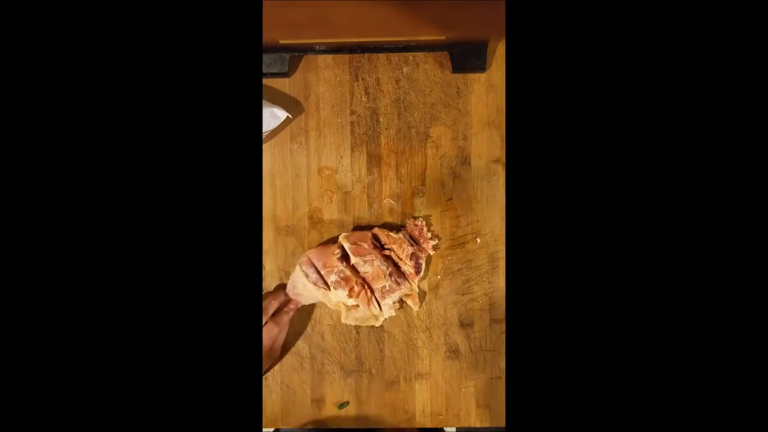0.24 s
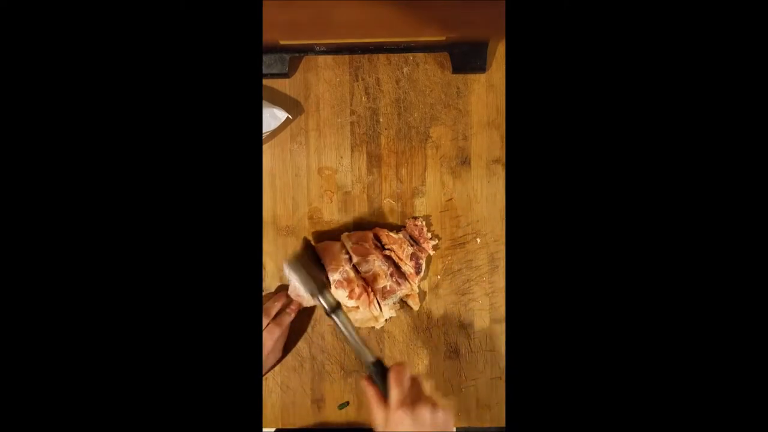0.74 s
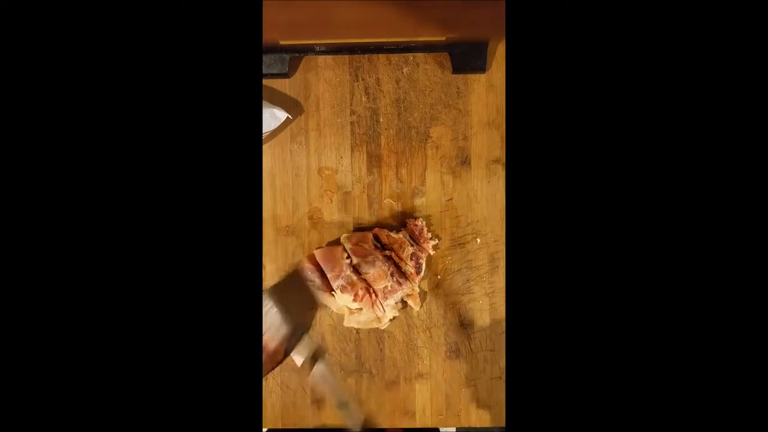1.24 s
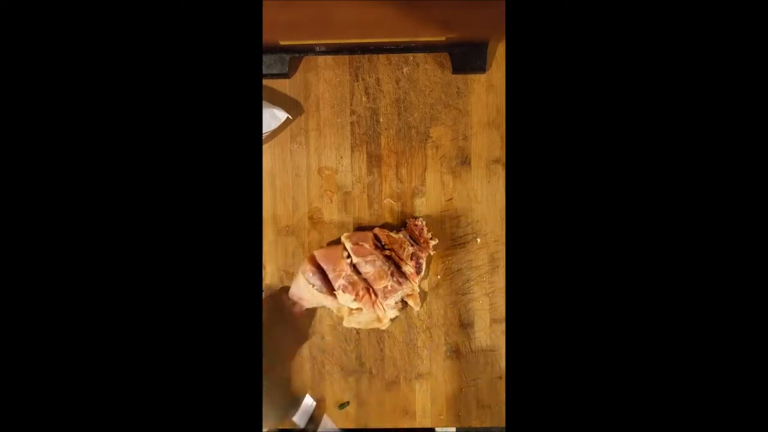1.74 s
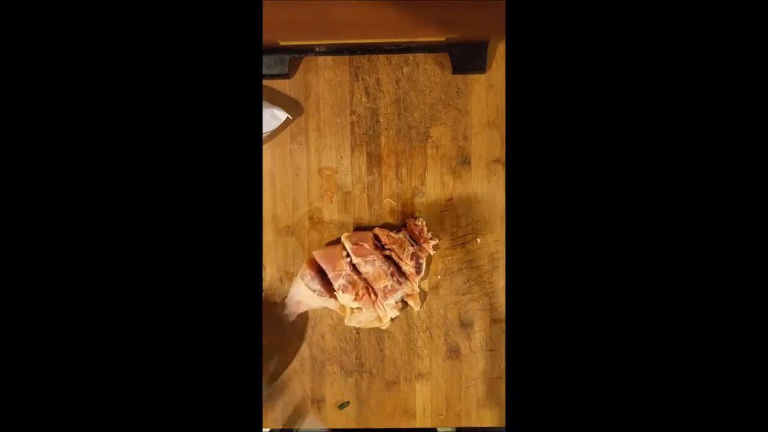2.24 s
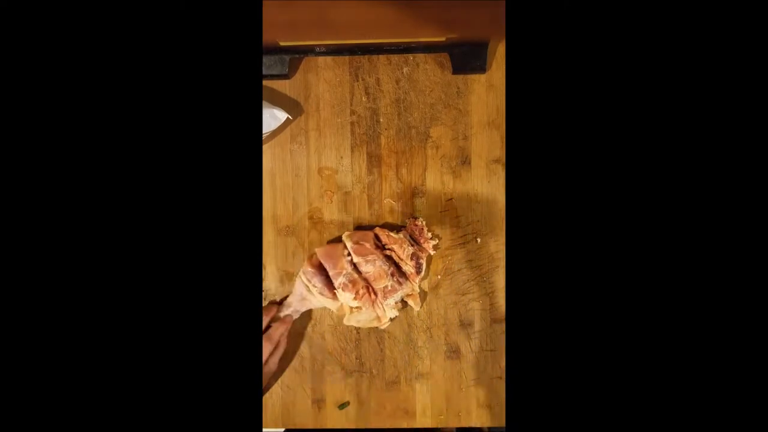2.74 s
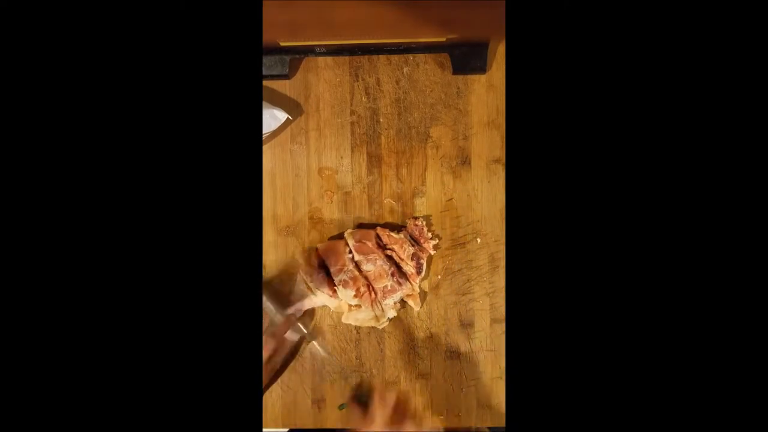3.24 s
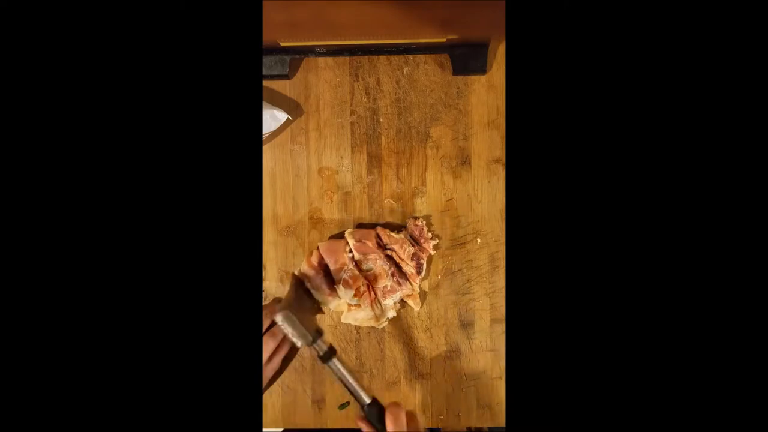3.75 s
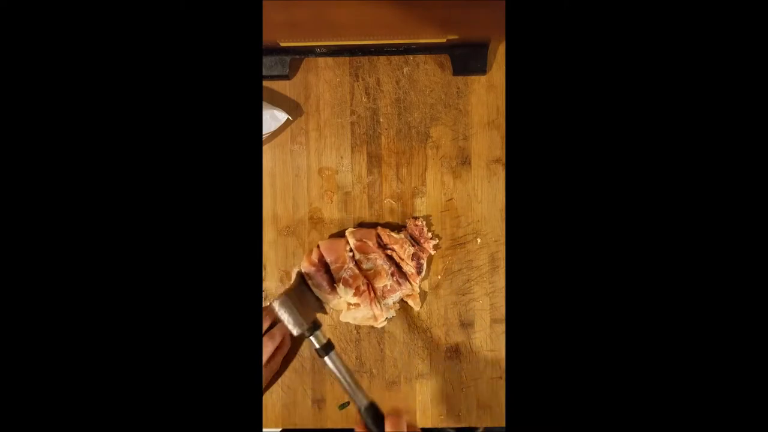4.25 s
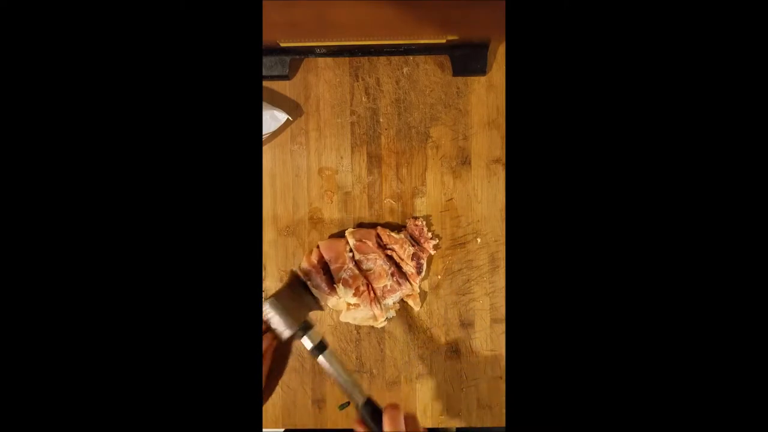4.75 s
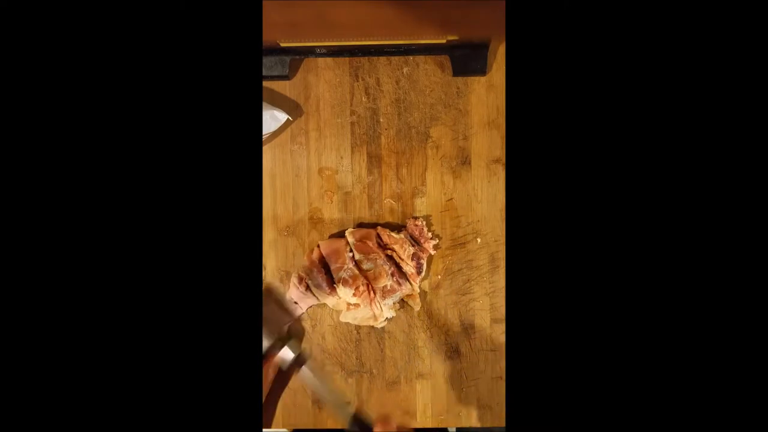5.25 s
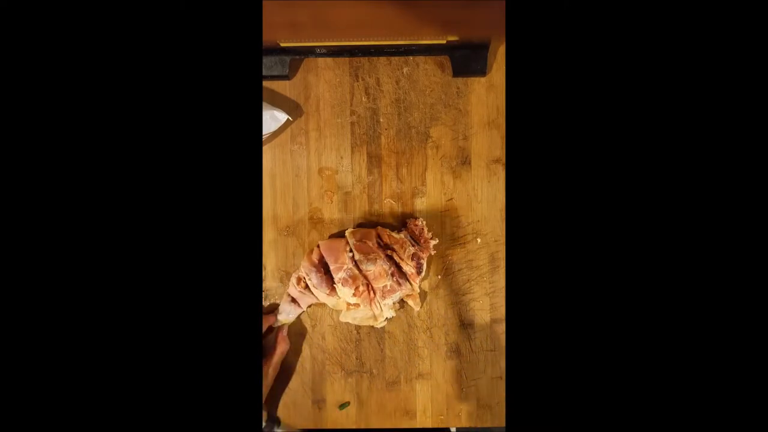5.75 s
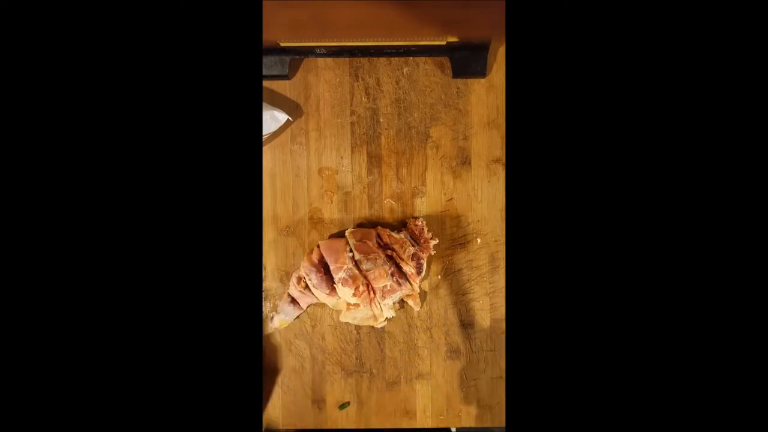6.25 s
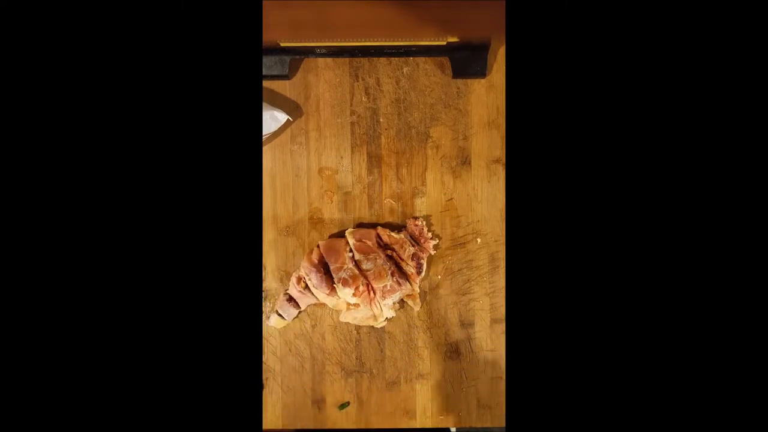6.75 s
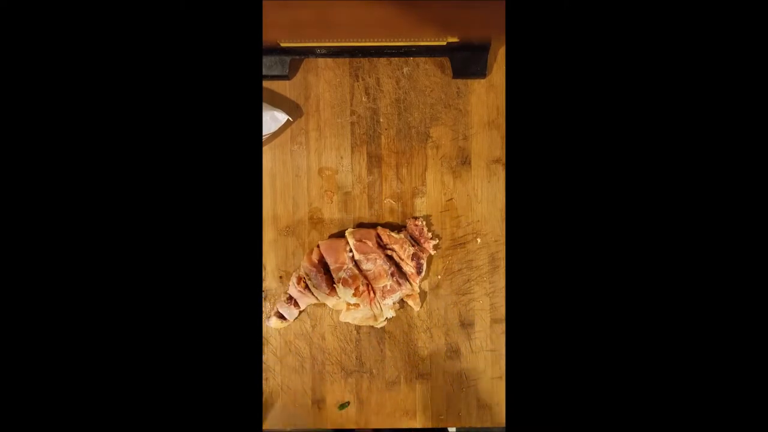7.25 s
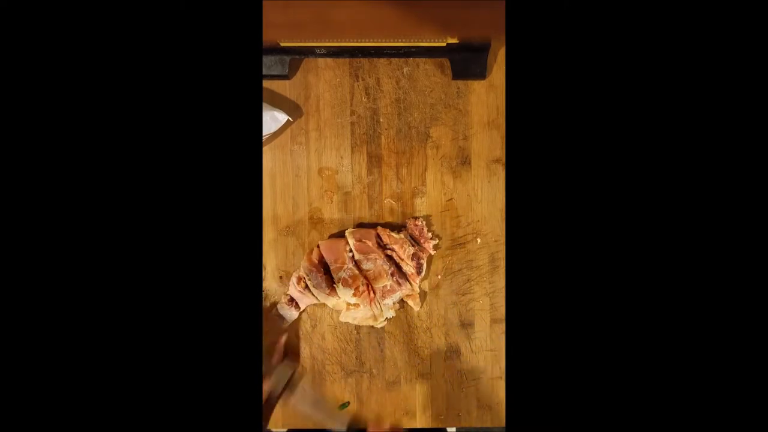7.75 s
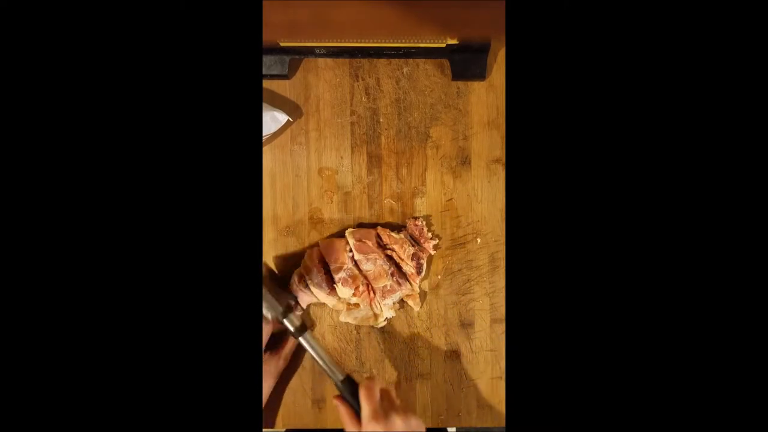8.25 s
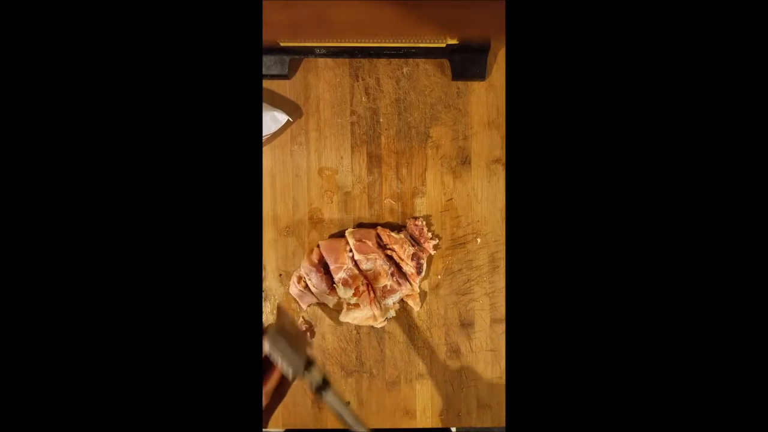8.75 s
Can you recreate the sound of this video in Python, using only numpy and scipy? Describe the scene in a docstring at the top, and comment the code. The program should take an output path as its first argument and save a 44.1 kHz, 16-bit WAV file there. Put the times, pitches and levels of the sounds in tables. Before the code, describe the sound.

A hatchet chops a raw chicken leg on a wooden block, cracking bone with hollow knocks, table thumps and rattles in a small kitchen.

```python
"""Sharp cracks and hollow wooden knocks: a hatchet chops a raw chicken leg on a butcher block in a small kitchen.
Each blow tears skin and bone (filtered random clicks), and knocks the block (decaying sines and wood noise).
The table thumps (struck resonators) and loose things on it rattle (a cluster of clicks, some ringing steel).
Between blows wet meat is shifted and ticks; at the end the blade scrapes and judders at the joint.
Decaying band noise gives the kitchen echo; filtered noise gives the quiet of the room."""
import sys
import numpy as np
from scipy import signal
from scipy.fft import rfft, irfft
from scipy.io import wavfile

SR = 44100
rng = np.random.default_rng(int(sys.argv[2]) if len(sys.argv) > 2 else 0)


def unload_audio(sound):
    """Save the sound as a 16-bit wav file, at the path given as the first command line argument."""
    columns = np.transpose(np.atleast_2d(sound))
    # keep every value between -1 and 1, then stretch to whole-number steps
    steps = np.round(np.clip(columns, -1, 1) * 32767)
    wavfile.write(sys.argv[1], SR, steps.astype(np.int16))


N = 397339

# blows: t/s, strength/dB, time through the meat/s, clack centre f/Hz, bone crack re strength/dB
BLOWS = [(-.094, -24.5, 0.0056, 730, -7.5), (.339, -24, .004, 970, -0.5), (0.7223, -24, 0.00058, 980, -8.5),
         (1.108, -51, .009, 1400, 1.5), (1.49, -24.5, 0.0016, 820, -24), (1.859, -28, .001, 971.1, -24),
         (2.519, -25.5, .0115, 1040, -19), (2.901, -20, .007, 1094, -6), (3.282, -20, 0.0033, 844, -19),
         (3.738, -29.5, 0.0047, 1070, -3.5), (4.105, -22.5, 0.0091, 940, -5),
         (4.521, -20, .0027, 1020, -18), (5.083, -33.5, .008, 1118, -6), (5.493, -18, 0.011, 1080, -21),
         (5.862, -24.5, 0.00074, 1114, -5.5), (6.411, -38, .0045, 1150, -2),
         (6.85, -19.5, 0.0083, 830.3, -13), (7.32, -20.5, 0.0035, 1404, -20.5),
         (7.823, -26, 0.0027, 1130, -28)]
# tearing skin and bone: f/Hz, relative level/dB per Hz
CRACK_SPECTRUM = [(300, 6), (900, 0.5), (2000, 7.5), (3500, 0), (5000, -6.5), (6600, -6), (9000, -17.5),
                  (13000, -12), (16000, -19)]
# lowest bending modes of the block: nominal f/Hz, nominal level/dB, t60/s
BLOCK_BENDING_MODES = [(517.1, -2.5, .1), (556.1, 0, 0.15), (612.3, 5, 0.052), (681, -7.5, 0.07)]
# stiffer modes of the block: nominal f/Hz, nominal level/dB, t60/s
BLOCK_CLACK_MODES = [(833.5, 0.5, .07), (1007, -6, 0.026), (1159, -3.5, .045), (1240, -4, 0.0043),
                     (1594, -4, 0.024), (1660, -7.5, 0.08), (1828, 0, 0.054)]
# dense wood resonances between the modes: f/Hz, relative level/dB per Hz
WOOD_SPECTRUM = [(100, -26), (200, -12.5), (400, -4), (600, -2), (1000, -3), (1800, -5), (2300, -6),
                 (3200, -15.5), (5000, -32), (8000, -44.5), (16000, -49.5)]
# table under the block: nominal f/Hz, nominal level/dB, t60/s, left minus right/dB
TABLE_TOP_MODES = [(57.7, -13, 0.28, -0.5), (72.4, -9, 0.37, 2.5), (97.8, -1.5, .21, 0),
                   (128.5, -7.5, 0.22, -5), (160.3, -1.5, 0.15, -2.5), (201.7, -8, 0.16, -7),
                   (263.8, -14.5, 0.22, -4), (369, -11, 0.24, 6.5)]
# loose things falling back: f/Hz, relative level/dB per Hz
RATTLE_SPECTRUM = [(200, -7.5), (400, -3), (600, 5.5), (1100, -4), (1700, -4), (2500, -6), (3500, -15),
                   (5000, -24.5), (6500, -30.5), (9000, -36.5), (16000, -34.5)]
# loose steel things on the table: f/Hz, relative level/dB, t60/s
LOOSE_STEEL_MODES = [(1703, -8, 0.22), (2135, -2, 0.082), (2410, -13.5, 0.22), (3250, -17, 0.099),
                     (6500, -34.5, 0.24)]
# meat being shifted: t/s, length/s, nominal level/dB
MEAT_SHIFTS = [(.16, 0.11, -56), (0.565, 0.3, -56.5), (1.385, 0.15, -69), (2.302, 0.1, -55.5),
               (3.93, 0.13, -50.5), (5.225, .14, -59.5), (8.574, 0.092, -60), (8.89, 0.10273, -65)]
# wet skin peeling: f/Hz, relative level/dB per Hz
SQUELCH_SPECTRUM = [(300, -20), (900, -2.5), (1700, 3.5), (3000, 1), (5000, -9.5), (9000, -16),
                    (16000, -15)]
# blade scraping at the joint: t/s, length/s, nominal level/dB
BLADE_SCRAPES = [(8.208, 0.09013, -55), (8.314, 0.17, -51.5), (8.506, 0.13, -52.5)]
# steel sliding on bone: f/Hz, relative level/dB per Hz
SCRAPE_SPECTRUM = [(300, 1), (600, 6), (1100, -3), (1700, 4), (2700, -11.5), (4000, -7.5), (4700, -17),
                   (5300, -19), (6000, -24), (8500, -30), (9700, -14), (10800, -24), (16000, -24)]
# juddering drags on the block: t/s, length/s, level before stereo balance/dB
BLOCK_DRAGS = [(3.94, 0.179, -48.5), (8.26, 0.034, -56), (8.404, 0.019, -51), (8.533, 0.036, -57.5)]
# wet ticks and smacks: t/s, nominal level/dB
WET_TICKS = [(.175, -48), (1.117, -31.5), (4.32, -41.5), (4.885, -43.5), (5.239, -42), (6.667, -49),
             (8.192, -42), (8.583, -44.5)]
# tint of the kitchen echo: f/Hz, relative level/dB
ECHO_COLOUR = [(60, -20), (200, -2), (400, 1), (600, 3), (1000, -2.5), (2000, -4), (5000, -0.5), (9000, 1),
               (16000, -3.5)]
# kitchen decay: f/Hz, t60/s
ECHO_T60 = [(60, 0.85), (250, 0.41), (600, 0.43), (1200, 0.54), (2500, 0.49), (6000, 0.43), (10000, 0.32),
            (16000, 0.22)]
# quiet room: f/Hz, relative level/dB per Hz
FLOOR_SPECTRUM = [(30, -16), (70, -3), (180, -1), (300, -9.5), (450, -8.5), (570, -0.5), (750, -7),
                  (1000, -14), (1700, -13), (2500, -16.5), (4000, -24), (8000, -33.5), (16000, -32.5)]

# meat brakes the edge: landing level re strength after a clean cut, and its loss per doubling of the time
CLEAN_CUT_S, LANDING_DB, BRAKING_DB_PER_DOUBLING = .001, 13, 4
# knock and clack are equal at this centre; the clack gains on the knock above it
EVEN_CLACK_HZ, CLACK_DB_PER_OCTAVE = 965, 13.5
# the table takes the whole blow, however braked: levels re strength
THUMP_DB, RATTLE_DB = -1.5, 1.0
# the rattle gains this share on every dB above a firm strength, and loses it below
FIRM_DB, RATTLE_GROWTH = -24, .15
# shove on the table: shortest time constant, and share of the cutting time added
PUSH_S, PUSH_SHARE = 0.0018, .2
# the head hops and lands again: mean delay, level re first landing
HOP_S, HOP_DB = .032, -13
TICK_T60_S = 0.083
# judder pitch at rest, and its mid-stroke rise per second of stroke
DRAG_HZ, DRAG_RISE_HZ_PER_S = 178.8, 130
CUTOFF_HZ = 16300


def from_db(db):
    """Decibels to gain."""
    return 10 ** (np.asarray(db) / 20)


def at_hz(points, hz):
    """Interpolate a table on a log-frequency axis."""
    points = np.array(points)
    return np.interp(np.log(hz), np.log(points[:, 0]), points[:, 1])


def clock(length_s):
    """Sample times from zero."""
    return np.arange(int(length_s * SR)) / SR


BLOW_T_S = clock(.6)


def unit(x, length_s):
    """Scale to the energy of rms 1 held for this long."""
    mean_energy = np.mean(np.sum(x ** 2, axis=-1))
    return x / np.sqrt(mean_energy / (length_s * SR) + 1e-20)


def add(out, start_s, x):
    """Mix in at a time; what falls outside is dropped."""
    i = int(round(start_s * SR))
    a, b = max(i, 0), min(i + x.shape[-1], out.shape[-1])
    if b > a:
        out[..., a:b] += x[..., a - i:b - i]


def colour(x, spectrum):
    """Minimum-phase filter with the given spectrum, via the folded cepstrum."""
    size = 4096
    hz = np.maximum(np.arange(size // 2 + 1) * SR / size, 1)
    cepstrum = irfft(np.log(from_db(at_hz(spectrum, hz))))
    cepstrum[1:size // 2] *= 2
    cepstrum[size // 2 + 1:] = 0
    impulse = irfft(np.exp(rfft(cepstrum)))
    return signal.fftconvolve(x, impulse[None], axes=-1)[:, :x.shape[-1]]


def ring(force, hz, t60_s):
    """Two-pole resonator: a unit click starts a decaying sine of height 1."""
    r, w = from_db(-60 / (t60_s * SR)), 2 * np.pi * hz / SR
    return signal.lfilter([0, np.sin(w)], [1, -2 * r * np.cos(w), r * r], force + 1e-18)


def fade(t, t60_s):
    """Exponential decay."""
    return np.exp(-np.log(1000) * t / t60_s)


def grains(t, per_s, spread_db):
    """Random clicks of uneven size, independent at the two microphones."""
    shape = (2, len(t))
    born = rng.random(shape) < per_s / SR
    size = from_db(spread_db * np.clip(rng.standard_normal(shape), -2, 2))
    return born * rng.choice([-1, 1], shape) * size


def alike_in_bass(x, hz=330):
    """Long waves reach both microphones alike: the side signal loses its bass."""
    high_pass = signal.butter(2, hz, "high", fs=SR, output="sos")
    apart = signal.sosfilt(high_pass, (x[0] - x[1]) / 2)
    return (x[0] + x[1]) / 2 + apart * np.array([[1], [-1]])


def chop(strength_db, through_s, centre_hz, bone_db, close_db=-7.5, crack_close_db=-3.0):
    """Crack first, table thump midway through the cut, block knock and rattle as the edge lands.

    Returns (direct sound, sound sent into the room)."""
    cut_doublings = np.log2(max(through_s, CLEAN_CUT_S / 10) / CLEAN_CUT_S)
    landing_db = strength_db + LANDING_DB - BRAKING_DB_PER_DOUBLING * cut_doublings
    lean_db = CLACK_DB_PER_OCTAVE * np.log2(centre_hz / EVEN_CLACK_HZ)
    knock_db, clack_db = landing_db - lean_db / 2, landing_db + lean_db / 2
    jolt_db = strength_db + RATTLE_DB + RATTLE_GROWTH * (strength_db - FIRM_DB)

    crack = from_db(strength_db + bone_db) * bone_crack(through_s)
    crack = alike_in_bass(crack * from_db([[.8], [-.8]]))

    block, table = np.zeros((2, 2, len(BLOW_T_S)))
    landing = block_knock(knock_db, clack_db, centre_hz)
    add(block, through_s, landing + blade_ring(knock_db))
    hop_s = HOP_S * (1 + .15 * rng.standard_normal())
    add(block, through_s + hop_s, from_db(HOP_DB) * landing)

    add(table, through_s, alike_in_bass(rattle(jolt_db) * from_db([[-.8], [.8]])))
    thump = table_thump(PUSH_S + PUSH_SHARE * through_s)
    add(table, through_s / 2, from_db(strength_db + THUMP_DB) * thump)

    # crack and block face the microphone: drier than the table
    sent = from_db(crack_close_db) * crack + from_db(close_db) * block + table
    return crack + block + table, sent


def bone_crack(through_s, snap_t60_s=.048, rise_s=0.0013, splinter_db=-7.0, splinter_t60_s=0.07):
    """Fibres tear in a dense run that dies once the edge stops; a few bone splinters snap singly."""
    after_s = np.maximum(BLOW_T_S - through_s, 0)
    entering = 1 - np.exp(-BLOW_T_S / (rise_s + through_s / 2))   # a thick cut builds up more slowly
    fibres = grains(BLOW_T_S, per_s=16000, spread_db=7.0) * entering * fade(after_s, snap_t60_s)
    splinters = grains(BLOW_T_S, per_s=490, spread_db=5.5) * entering * fade(after_s, splinter_t60_s)
    tearing = unit(fibres, 0.018) + from_db(splinter_db) * unit(splinters, 0.0074)
    return unit(colour(tearing, CRACK_SPECTRUM), 0.063)


def block_knock(knock_db, clack_db, centre_hz, focus_db=2.5, wood_db=-0.5, wood_t60_s=0.16, cushion_s=0.0022):
    """Bending modes knock under a clack of stiffer modes and wood noise, tinted by where the edge lands."""
    swell = 1 - np.exp(-BLOW_T_S / cushion_s)   # the meat cushions the contact
    noise = rng.standard_normal((2, len(BLOW_T_S))) * fade(BLOW_T_S, wood_t60_s)
    wood = unit(colour(noise, WOOD_SPECTRUM), 0.016)
    clack = block_modes(BLOCK_CLACK_MODES, contact_s=.003) + from_db(wood_db) * wood
    focus = [(centre_hz / np.sqrt(2), 0), (centre_hz, focus_db), (centre_hz * np.sqrt(2), 0)]
    clack = unit(colour(clack * swell, focus), 0.024)
    knock = unit(block_modes(BLOCK_BENDING_MODES) * swell, 0.032) * from_db([[-1.4], [1.]])
    return from_db(knock_db) * knock + from_db(clack_db) * clack


def block_modes(modes, contact_s=.0009, vary_db=2.5, detune=.018, path_s=.0002, lag_s=0.00038):
    """The landing edge sets block modes ringing as decaying sines, each starting within the contact."""
    out = np.zeros((2, len(BLOW_T_S)))
    for hz, db, t60_s in modes:
        pitch_hz = hz * (1 + detune * rng.standard_normal())   # the buried blade loads the block anew
        gain = from_db(db + vary_db * rng.standard_normal())
        mode = gain * np.sin(2 * np.pi * pitch_hz * BLOW_T_S) * fade(BLOW_T_S, t60_s)
        start_s = rng.random() * contact_s
        add(out[0], start_s, mode)
        # the right microphone is farther away
        add(out[1], start_s + lag_s + path_s * rng.standard_normal(), mode)
    return unit(out, 0.024)


def blade_ring(knock_db, hz=12308, t60_s=.14, ring_db=-14.5):
    """The hatchet head sings thinly as a sine, 3 dB louder per dB of knock, so hard landings favour it."""
    tone = np.sin(2 * np.pi * hz * BLOW_T_S) * fade(BLOW_T_S, t60_s)
    return from_db(knock_db) ** 3 * from_db(ring_db) * tone


def table_thump(push_s, rebound_s=.031, rebound=0.43, vary_db=2.5, detune=0.025):
    """The block shoves the table, lifts a little and settles: two force pulses drive the table modes."""
    force, out = np.zeros(len(BLOW_T_S)), 0
    push = BLOW_T_S / push_s * np.exp(-2 * np.pi * BLOW_T_S / push_s)
    add(force, 0, push)
    add(force, rebound_s, rebound * push)
    for k, (hz, db, t60_s, pan_db) in enumerate(TABLE_TOP_MODES):
        mode = ring(force, hz * (1 + detune * rng.standard_normal()), t60_s)
        gain = (-1) ** k * from_db(db + vary_db * rng.standard_normal())
        out = out + gain * mode * from_db([[pan_db / 2], [-pan_db / 2]])
    return unit(out, .065)


def rattle(jolt_db, airborne_s=0.035, spread_s=.024, steel_db=-10.0, loose_above_db=-14.5):
    """Jolted things fall back in a cluster of contacts, which ring steel; weak jolts ring it less."""
    cluster = np.exp(-.5 * ((BLOW_T_S - airborne_s) / spread_s) ** 2)
    contacts = grains(BLOW_T_S, per_s=1100, spread_db=4.0) * cluster
    steel = sum(from_db(db) * unit(ring(contacts, hz, t60_s), 0.092) for hz, db, t60_s in LOOSE_STEEL_MODES)
    ringing_db = steel_db + min(jolt_db - loose_above_db, 0) / 2
    clatter = unit(colour(contacts, RATTLE_SPECTRUM), 0.079)
    return from_db(jolt_db - 2.5) * (clatter + from_db(ringing_db) * steel)


def shift(length_s, db, spectrum):
    """Sliding contact: a swell of tiny catches, wet skin peeling or steel on bone."""
    t = clock(length_s)
    catches = grains(t, per_s=2500, spread_db=3.5) * np.sin(np.pi * t / length_s)
    return from_db(db - 3.5) * unit(colour(catches, spectrum), length_s)


def drag(length_s, db, third_db=-10.0, rough=0.33, waver_s=0.009):
    """Stick-slip hum on the block: pitch and level follow the sliding speed, grip wavers at random."""
    t = clock(length_s)
    speed = np.sin(np.pi * t / length_s)
    hz = DRAG_HZ + DRAG_RISE_HZ_PER_S * length_s * speed
    phase = 2 * np.pi * np.cumsum(hz) / SR
    grip = 1 + rough * np.interp(t / waver_s, np.arange(len(BLOW_T_S)), rng.standard_normal(len(BLOW_T_S)))
    hum = (np.sin(phase) + from_db(third_db) * grip * np.sin(3 * phase)) * grip * speed
    return from_db(db) * unit(hum, length_s) * from_db([[-4.], [1.5]])


def tick(db, t60_s):
    """A strand of wet meat lets go, or is lightly patted: a fading burst of clicks."""
    smack = grains(BLOW_T_S, per_s=5000, spread_db=6.0) * fade(BLOW_T_S, t60_s)
    spectrum = [(500, -11.5), (2600, -5), (3300, 6), (4000, -6.5), (16000, -13.5)]
    return from_db(db - 8.5) * unit(colour(smack, spectrum), 0.004)


def kitchen(first_s=0.0033, build_s=0.0051):
    """Stereo echo pattern: reflections thicken, then die band by band."""
    t = clock(.9)
    edges_hz = np.geomspace(45, 17000, 15)
    out = 0
    for low_hz, high_hz in zip(edges_hz, edges_hz[1:]):
        band_pass = signal.butter(2, [low_hz, high_hz], "band", fs=SR, output="sos")
        band = signal.sosfilt(band_pass, rng.standard_normal((2, len(t))))
        hz = np.sqrt(low_hz * high_hz)
        out = out + band * from_db(at_hz(ECHO_COLOUR, hz)) * fade(t, at_hz(ECHO_T60, hz))
    return out * np.clip((t - first_s) / build_s, 0, 1) / np.sqrt(SR)


def quiet_room(db):
    """Steady background: coloured noise."""
    return from_db(db) * unit(colour(rng.standard_normal((2, N)), FLOOR_SPECTRUM), N / SR)


def scene(room_db=11.0, floor_db=-61.0):
    """All sounds on the block, their kitchen echo and the quiet room."""
    small = [(s, shift(length_s, db, SQUELCH_SPECTRUM)) for s, length_s, db in MEAT_SHIFTS]
    small += [(s, shift(length_s, db, SCRAPE_SPECTRUM)) for s, length_s, db in BLADE_SCRAPES]
    small += [(s, drag(length_s, db)) for s, length_s, db in BLOCK_DRAGS]
    small += [(s, tick(db, TICK_T60_S)) for s, db in WET_TICKS]
    sounds = [(s, *chop(*blow)) for s, *blow in BLOWS]
    sounds += [(s, x, x) for s, x in small]
    room = from_db(room_db) * alike_in_bass(kitchen()) * from_db([[-1.3], [1.3]])
    out = quiet_room(floor_db)
    for s, direct, sent in sounds:
        add(out, s, direct)
        add(out, s, signal.fftconvolve(sent, room, axes=-1))
    return out


def record(dry, low_cut_hz=55):
    """The microphone thins the deep bass, the highest peaks are rounded off and the top is cut."""
    x = signal.sosfilt(signal.butter(2, low_cut_hz, "high", fs=SR, output="sos"), dry)
    rounded = x / (1 + x ** 6) ** (1 / 6)
    return signal.sosfilt(signal.ellip(10, .1, 80, CUTOFF_HZ, fs=SR, output="sos"), rounded)


dry = scene()
out = record(dry)
unload_audio(out)
```